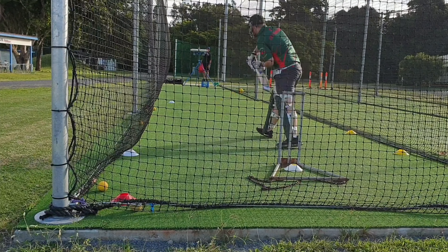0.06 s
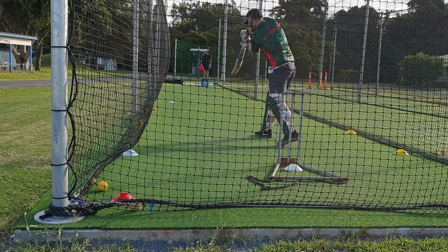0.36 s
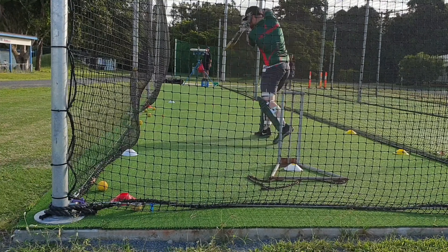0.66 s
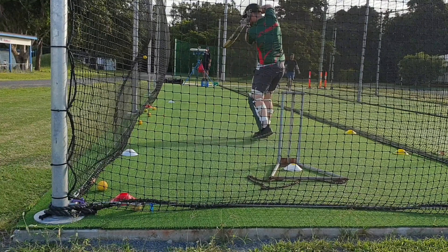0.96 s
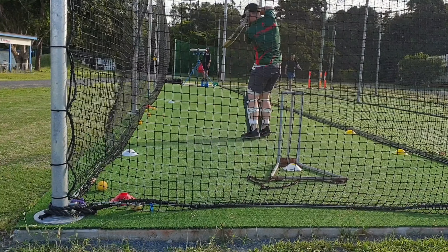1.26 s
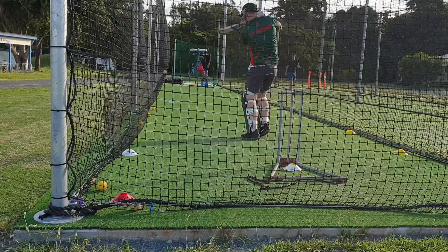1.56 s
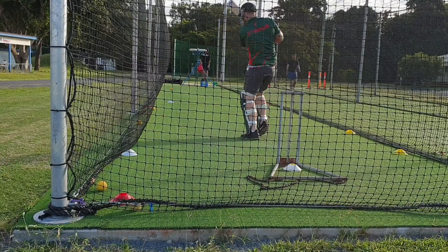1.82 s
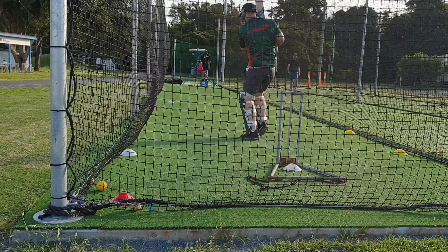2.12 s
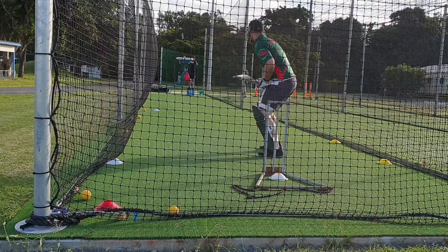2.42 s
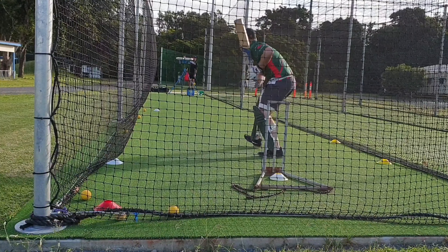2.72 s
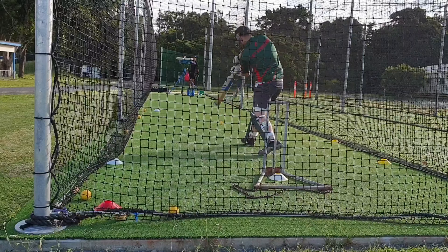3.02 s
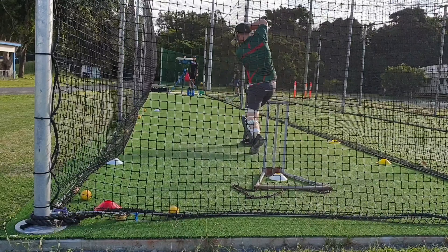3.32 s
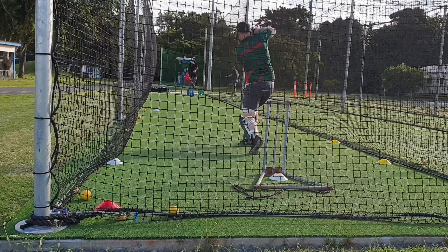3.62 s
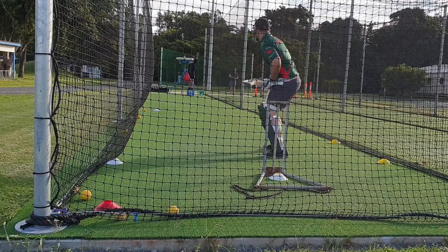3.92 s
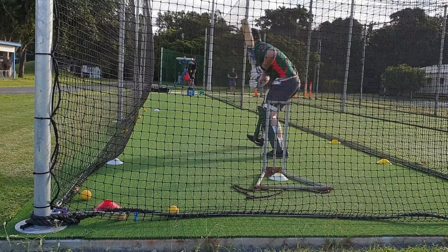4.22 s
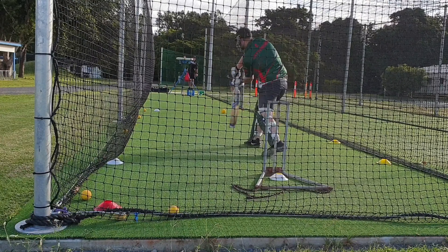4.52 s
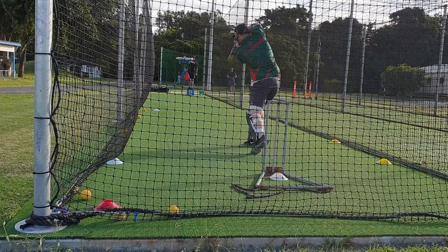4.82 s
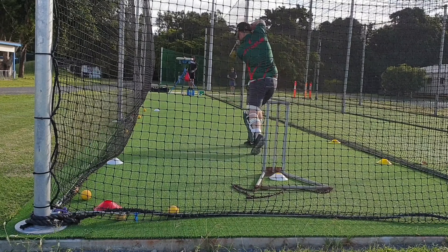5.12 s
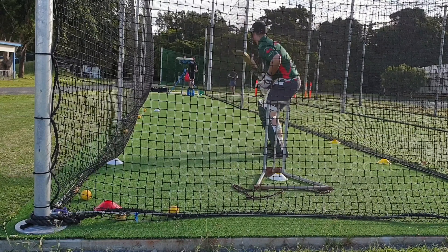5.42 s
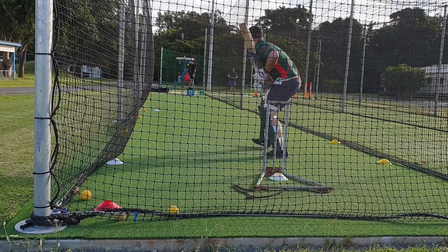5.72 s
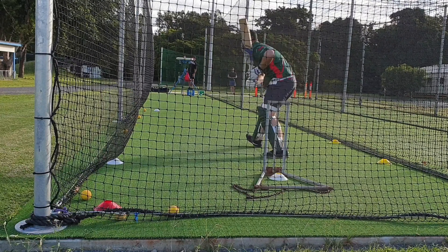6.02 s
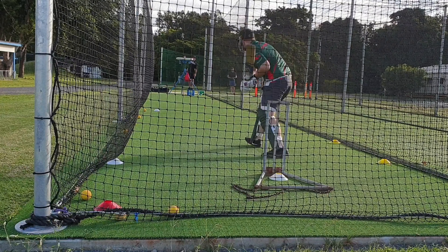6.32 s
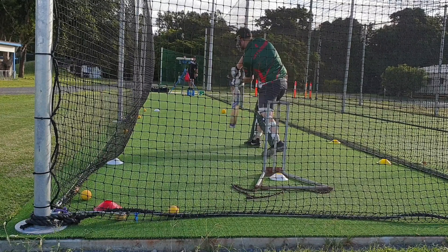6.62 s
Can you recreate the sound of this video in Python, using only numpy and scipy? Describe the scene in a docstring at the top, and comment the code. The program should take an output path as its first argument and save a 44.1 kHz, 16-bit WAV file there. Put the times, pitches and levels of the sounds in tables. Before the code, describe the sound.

In an outdoor practice net, a slowed, deep bat crack is followed by rattling netting and small knocks of the ball. Then, twice at normal speed, an air cannon thumps, the ball pats the mat and a bat cracks it sharply into the net. A last thump comes slowed and deeper. Wind rumbles on the microphone throughout, with faint high insects.

```python
"""Sharp bat cracks and hollow cannon thumps in an outdoor cricket net, over rumbling wind and insects.
An air cannon fires a ball with a hiss and a ring of its barrel; the ball whizzes in, pats the mat, cracks
off the willow bat and runs into the netting; fences and a line of trees answer. Of three shots the first
opens with the ball already in flight. The first and last are in slow motion, so they sound lower and
longer. Cue times are scene seconds; pitches and decays are given at natural speed."""
import sys
import numpy as np
from scipy import signal
from scipy.fft import rfft, irfft, next_fast_len
from scipy.io import wavfile
from scipy.ndimage import uniform_filter1d

SR = 44100
rng = np.random.default_rng(int(sys.argv[2]) if len(sys.argv) > 2 else 0)


def persist_wave(psi):
    """Save psi, clipped to +-1, as 16-bit WAV."""
    counts = np.round(np.clip(psi, -1, 1) * 32767).astype(np.int16)
    wavfile.write(sys.argv[1], SR, np.atleast_2d(counts).T)


N = 293706
T = np.arange(SR) / SR  # the first second of any sound
LEAD_S = .05
AGE = T[:SR // 2] - LEAD_S  # time from a blow, with room for what leads up to it

# dull body of the net's thud and the bat's swish: (frequency [Hz], level [dB])
THUD_EQ = [(60, -27), (200, 16), (450, 13), (750, 8), (1100, -6.5), (2000, -7), (8000, -40.5)]
# bright edge of rattling cords and the ball's scuff: (frequency [Hz], level [dB])
RATTLE_EQ = [(300, -36.5), (1400, -1), (2700, 10), (4000, 4.5), (7000, 4.5), (15000, -13)]


def undb(db):
    """Decibels to gain."""
    return 10 ** (np.asarray(db) / 20)


def fade(t, t60):
    """Falls 60 dB in t60 seconds; silent before t = 0."""
    return (t >= 0) * undb(-60 * np.abs(t) / t60)


def swell(t, rise, fall):
    """Peaks at t = 0, with a time constant on either side."""
    return np.exp(-np.abs(t) / np.where(t < 0, rise, fall))


def noise(size, side_db):
    """Stereo white noise; side_db sets its width."""
    mid, side = rng.standard_normal((2, size))
    width = undb(side_db)
    return np.array([mid + width * side, mid - width * side]) / np.hypot(1, width)


def colour(x, spectrum, size=4096):
    """Minimum-phase EQ through (frequency [Hz], level [dB]) points."""
    hz, db = np.transpose(spectrum)
    bin_hz = np.arange(size // 2 + 1) * SR / size
    gain = undb(np.interp(np.log(bin_hz + 1), np.log(hz), db))
    cepstrum = irfft(np.log(gain))[:size // 2]
    cepstrum[1:] *= 2
    response = irfft(np.exp(rfft(cepstrum, size)))
    return signal.oaconvolve(np.atleast_2d(x), response[None], axes=1)[:, :x.shape[-1]]


def click(db, spectrum):
    """One clean tick of the given colour."""
    return undb(db) * colour(signal.unit_impulse(len(AGE), int(LEAD_S * SR)), spectrum)


def band_limit(x, top_hz=15800):
    """A steep high cut."""
    return signal.sosfilt(signal.ellip(12, .1, 100, top_hz, fs=SR, output="sos"), x)


def add(out, sound, s):
    """Mix a sound in from s seconds on."""
    start = int(round(s * SR))
    part = np.atleast_2d(sound)[:, max(-start, 0):out.shape[1] - start]
    out[:, max(start, 0):max(start, 0) + part.shape[1]] += part


def cannon(thump_db, hiss_db, whizz_db):
    """Air spits past the ball, the barrel rings, the rest of the charge vents and the ball flies off."""
    # modes of the air in the barrel: (frequency [Hz], level [dB], t60 [s])
    modes = [(123.2, -35.5, 0.23), (148, -10.5, 0.16), (222, -15.5, 0.043), (292.7, -16, 0.03),
             (413, -30.5, 0.044), (596, -42, 0.12)]
    # leaking air, venting air and the ball's flight: (frequency [Hz], level [dB])
    leak_eq = [(300, 1.5), (900, 0), (1300, 9.5), (2700, -14.5), (3700, 4), (5000, -2.5), (7500, 3),
               (11000, -1), (15000, -6.5)]
    vent_eq = [(300, -2), (900, 2), (1500, 10.5), (2700, 2.5), (3800, 7.5), (5000, -1.5), (7500, -3.5),
               (11000, -7), (15000, -9.5)]
    whizz_eq = [(300, -16), (800, 4), (1500, -7.5), (2400, 2), (3400, 1.5), (4600, -2), (8000, -4.5),
                (15000, -12)]
    barrel = sum(undb(db) * np.cos(2 * np.pi * hz * AGE) * fade(np.maximum(AGE, 0), t60)
                 for hz, db, t60 in modes)
    thump = undb(thump_db) * barrel * np.exp(-(np.minimum(AGE, 0) / .0067) ** 2)
    # the boom comes back dull off a building
    delayed = np.interp(AGE - .152, AGE, thump, left=0)
    echo = colour(delayed, [(80, -26), (170, -17), (300, -23.5), (600, -42)])
    spits = (.99 * swell(AGE + .0058, .00043, .0013)
             + 1.8 * swell(AGE + .0023, .0011, .00081)
             + .3 * swell(AGE + .01, .003, .003))
    leak = colour(noise(len(AGE), side_db=-2) * spits, leak_eq)
    vent = colour(noise(len(AGE), side_db=-10.5) * undb(-12.5) * swell(AGE - .034, .027, .012), vent_eq)
    flight = swell(AGE - .31, .23, .54) * (AGE > 0)
    whizz = undb(whizz_db) * colour(noise(len(AGE), side_db=-1), whizz_eq) * flight
    return thump + echo + undb(hiss_db) * (leak + vent) + whizz + whistle()


def whistle(peak_db=-55.5, peak_hz=3496, peak_s=.285, glide_hz_per_s=9500):
    """The dimpled ball whistles as it flies nearer: a breathy band that swells, glides up and dies."""
    t = AGE - peak_s
    eddies = colour(noise(len(AGE), side_db=-4), [(200, .5), (350, -5), (700, -21.5), (2000, -59.5)])
    turns = np.cumsum(peak_hz + glide_hz_per_s * t) / SR
    return undb(peak_db) * eddies / eddies.std() * np.cos(2 * np.pi * turns) * swell(t, .06, .038)


def breeze(clock, buffet_db=3.5, buffets_per_s=9):
    """Wind level in dB: a slowly changing breeze, single gusts and random buffets."""
    # the underlying breeze: (time [s], level before trim [dB])
    levels = [(0.0, -42.5), (0.17, -47), (0.63, -62), (2.39, -55), (2.5, -51), (3.95, -59), (4.19, -42.5),
              (4.88, -45.5), (5.45, -48.5), (5.94, -39.5), (6.27, -51), (6.66, -42.5)]
    # gusts on top of it: (time [s], peak level [dB])
    peaks = [(.24, -45.5), (1.16, -41.5), (1.85, -46.5), (2.449, -44), (4.54, -37), (4.98, -40.5),
             (6.23, -37), (6.56, -32)]
    steady = undb(np.interp(clock, *np.transpose(levels)) + 2.5)
    gusts = sum(undb(db) * swell(clock - s, rise=.06, fall=.08) for s, db in peaks)
    buffets = np.interp(clock * buffets_per_s, np.arange(200), rng.standard_normal(200))
    return 20 * np.log10(np.hypot(steady, gusts)) + buffet_db * buffets


def veer(clock, from_db=-8, to_db=5, at_s=2.1, turn_s=.37):
    """Left and right gain as the wind veers from right to left; the windward side takes more."""
    turned = (1 + np.tanh((clock - at_s) / turn_s)) / 2
    lean_db = from_db + (to_db - from_db) * turned
    return undb(np.array([lean_db, -lean_db]) / 2)


def wind(clock):
    """Wind rumbles on the microphone; distant leaves stir a little more when it is up."""
    # the distant hush and the close rumble: (frequency [Hz], level [dB])
    hush_eq = [(100, -34), (450, -47.5), (750, -51), (1200, -55.5), (2000, -60), (4000, -59.5),
               (7000, -63.5), (11000, -72), (15000, -78.5)]
    rumble_eq = [(15, -9.5), (30, -6.5), (60, 6.5), (110, -4.5), (200, -11.5), (400, -32.5), (1000, -61),
                 (4000, -87)]
    breeze_db = breeze(clock)
    hush = colour(noise(len(clock), side_db=-1.5), hush_eq) * undb(.28 * (breeze_db + 48))
    rumble = colour(noise(len(clock), side_db=-3.5), rumble_eq)
    rumble *= veer(clock) * undb(breeze_db) / rumble.std()
    return hush + rumble


def bush_cricket(clock):
    """A high trill: each wing stroke slides down in pitch as it slows, and scrapes a little unevenly."""
    # course of the trill: (time [s], syllable rate [1/s], level [dB])
    trill = [(0, 124, -59.5), (.6, 130, -64), (.95, 120, -59.5), (1.171, 55, -60), (1.2, 120, -100)]
    s, rate, db = np.transpose(trill)
    syllable = np.cumsum(np.interp(clock, s, rate)) / SR % 1
    roughness = uniform_filter1d(rng.standard_normal(len(clock)), size=40)
    tooth_hz = 8000 * (1 - .07 * (syllable - .5) + .04 * roughness)
    envelope = undb(np.interp(clock, s, db)) * np.sin(np.pi * syllable) ** 2
    return envelope * np.sin(2 * np.pi * np.cumsum(tooth_hz) / SR)


def bat(contact_ms, knock_db, crack_db, ring_db, pitch, spread_db, swish_db):
    """A half-sine push radiates its slope as a knock; the faces crack together and the blade rings.
    Returns the direct sound and the sound sent in all other directions."""
    # modes of the willow blade: (frequency before the pitch factor [Hz], level [dB], t60 [s])
    modes = [(590, -2.5, .015), (1440, -11.5, 0.02), (1830, -11, .011), (2240, -12, 0.015), (3286, 2, 0.02),
             (3630, -9, 0.024), (3970, -3.5, 0.016), (5500, -16, 0.0054), (6050, -8, .009),
             (8340, -12, 0.013), (11500, -3.5, 0.01)]
    # the knock, the crack and the sound sent round the nets: (frequency [Hz], level [dB])
    knock_eq = [(40, -16.5), (150, 1), (300, -1.5), (620, -5.5), (1500, -3.5), (4000, -13), (16000, -11.5)]
    crack_eq = [(300, -19), (1100, -13), (2000, -2.5), (3500, -2), (7000, -3), (10000, -6.5), (14500, -11),
                (17000, -26.5)]
    spread_eq = [(60, -3), (200, 11.5), (650, 15.5), (1100, 0.5), (2000, -7), (3400, 1), (6000, -0.5),
                 (10000, -1), (15000, -13)]
    contact = AGE * 1000 / contact_ms  # 0 to 1 while the ball is on the bat
    knock = colour(np.cos(np.pi * contact) * ((contact >= 0) & (contact < 1)), knock_eq)
    burst = noise(len(AGE), side_db=-3.5) * swell(AGE - .0009, .00052, .0015) * (AGE > 0)
    crack = colour(burst, [(hz * pitch, db) for hz, db in crack_eq])
    t = AGE - np.array([[0], [1]]) / SR  # the ring reaches the right side a sample later
    ring = sum(undb(db) * np.cos(2 * np.pi * hz * pitch * t) * fade(t, t60) for hz, db, t60 in modes)
    ring *= np.clip(contact * 2, 0, 1)  # it builds up while the ball presses in
    swish = colour(noise(len(AGE), side_db=-17), THUD_EQ) * swell(AGE, .0096, .0055)
    direct = (undb(knock_db) * knock + undb(crack_db) * crack
              + undb(ring_db) * ring + undb(swish_db) * swish)
    # the blade beams each mode its own way, so all round it the spectrum is smooth
    return direct, click(spread_db, spread_eq)


def mesh_rustle(per_second=90, tap_db=-25, rattle_db=-24):
    """After a stroke the shaken mesh goes on tapping and ticking, ever more faintly."""
    def taps():
        """Sparse ticks of uneven size, scattered left and right."""
        return (rng.random(SR) < per_second / SR) * noise(SR, side_db=1) * swell(T - .08, .03, .24)
    cords = colour(taps(), [(100, -12.5), (400, 7), (750, 13.5), (1100, 4), (2000, -9.5), (8000, -29.5)])
    # each tick sets the neighbouring cords buzzing for a few milliseconds
    buzz = rng.standard_normal(SR) * fade(T, .015)
    ticks = signal.fftconvolve(taps(), buzz[None] / np.linalg.norm(buzz), axes=1)[:, :SR]
    return undb(tap_db) * cords + undb(rattle_db) * colour(ticks, RATTLE_EQ)


def net_snap(thud_db, rattle_db):
    """The mesh snaps taut with a thud and its cords rattle on the frame."""
    thud = colour(noise(len(AGE), side_db=-18.5) * swell(AGE - .001, .00031, .0096), THUD_EQ)
    rattle = colour(noise(len(AGE), side_db=1) * swell(AGE - .001, .0005, .0014), RATTLE_EQ)
    return undb(thud_db) * thud + undb(rattle_db) * rattle


def net_catch(swing_s, thud_db, rattle_db, thud_loss_db=3, rattle_loss_db=11):
    """The net takes the ball and snaps taut once a swing; the rattle dies sooner than the thud."""
    out = np.zeros((2, SR))
    for k in range(4):
        add(out, net_snap(thud_db - k * thud_loss_db, rattle_db - k * rattle_loss_db), k * swing_s)
    return out


def tock(db):
    """The loose ball knocks on something hard: a scuff and a hollow note that varies at each knock."""
    # modes of the ball: (frequency [Hz], level [dB], t60 [s])
    modes = [(1425, -2, 0.013), (2424, 2, 0.022), (2750, -1.5, 0.032), (3520, -3, 0.011),
             (5780, -5.5, 0.013)]
    ring = np.zeros(len(AGE))
    for hz, mode_db, t60 in modes:
        strength, detune = rng.standard_normal(2)
        tone = np.sin(2 * np.pi * hz * (1 + .055 * detune) * AGE)
        ring += undb(mode_db + 2 * strength) * tone * fade(AGE, t60)
    scuff = undb(-16) * colour(rng.standard_normal((2, len(AGE))) * fade(AGE, .042), RATTLE_EQ)
    return undb(db) * (ring * np.clip(AGE / .00091, 0, 1) + scuff)


def bounce(db):
    """The ball lands with a dead pat on the artificial turf."""
    # the mat's dull tone: (frequency [Hz], level [dB])
    mat_eq = [(40, -17), (150, -3), (380, 3), (700, -7), (1000, -5), (1600, -22.5), (3000, -16.5),
              (5000, -26.5), (15000, -39.5)]
    return click(db, mat_eq)


def scrape(db):
    """A short swish of cord over the ball, fluttering from knot to knot."""
    # cord friction: (frequency [Hz], level [dB])
    cord_eq = [(300, -7), (1500, -16), (2500, 4), (3500, 7), (4600, 1), (7000, 2.5), (15000, -10)]
    knots = undb(2.5 * np.repeat(rng.standard_normal(len(AGE) // 200 + 1), 200)[:len(AGE)])
    return undb(db) * colour(noise(len(AGE), side_db=0) * knots * swell(AGE, .0081, .022), cord_eq)


def insect_chorus(clock, from_s=2.31):
    """Many insects blend into one thin, high band of noise."""
    band_eq = [(7500, -100), (8900, -65.5), (9500, -55), (10100, -67.5), (11200, -100)]
    return colour(noise(len(clock), side_db=1.5), band_eq) * (clock >= from_s)


def surroundings(dry):
    """Poles and fences scatter the sound at once; the trees send back a late wash."""
    # tone of the near and far reflections: (frequency [Hz], level [dB])
    fence_eq = [(100, -25), (300, -14), (750, -14.5), (1500, -6), (3500, -6.5), (7000, -8), (14000, -8)]
    trees_eq = [(100, -16), (400, -31.5), (1000, -24.5), (1700, -14.5), (3500, -14), (7000, -19),
                (11000, -27.5), (15000, -23)]

    def scatter(envelope, patchy_db):
        """Echoes of uneven strength under an envelope, with unit energy per channel."""
        patches = np.repeat(rng.standard_normal(SR // 100 + 1), 100)[:SR]
        echoes = noise(SR, side_db=-1.5) * envelope * undb(patchy_db * patches)
        return echoes / np.sqrt(np.sum(echoes ** 2) / 2)
    near = scatter(fade(T - .004, .32), patchy_db=3)
    far = scatter(swell(T - .2, .055, .17), patchy_db=2.2)
    response = colour(near, fence_eq) + colour(far, trees_eq)
    return signal.fftconvolve(dry, response, axes=1)[:, :dry.shape[1]]


def microphone_ports(stereo):
    """Each of the two ports colours the direct sound in its own way."""
    # balance of the ports: (frequency [Hz], left minus right [dB])
    balance = [(100, 1.5), (1500, 2), (4000, -1.5), (8000, .5), (12000, 4)]
    return np.vstack([colour(channel, [(hz, side * db / 2) for hz, db in balance])
                      for channel, side in zip(stereo, (1, -1))])


def shot(start, end, speed):
    """Everything that happens in one shot, at natural speed, then stretched to its playback speed."""
    # the cannon fires: (time [s], thump [dB], hiss [dB], whizz [dB])
    firings = [(-.38, -10.5, -13, -51), (2.707, 0.5, -28.5, -50), (4.263, -0.5, -29, -50),
               (5.836, -.5, -30, -48.5)]
    # bat meets ball: (time [s], contact [ms], knock [dB], crack [dB], ring [dB], pitch [factor],
    # send round the nets [dB], swish [dB])
    strokes = [(.3182, 0.81, -5.5, -5, -9, .78, 6.5, -45),
               (3.1542, 1.4, -1.5, -1.5, -9.5, 1.0, 11.5, -58.5),
               (4.7045, 1.47, -1, -6, -15, 1.08, 11.5, -46.5)]
    # the net takes the ball: (time [s], swing period [s], thud [dB], rattle [dB])
    catches = [(.352, .0425, -33, -23.5), (3.1705, .037, -30.5, -21), (4.7205, .0415, -29.5, -23)]
    # the ball knocks on something hard, lands on the mat, drags along the net: (time [s], level [dB])
    tocks = [(.377, -37), (.420, -33.5), (.514, -41.5), (.556, -42.5), (.776, -44.5), (.966, -41),
             (1.130, -38.5), (1.345, -53), (3.558, -47.5), (5.028, -49)]
    bounces = [(.482, 1), (.753, -7), (3.040, 6), (4.6037, 7), (4.846, -7)]
    scrapes = [(.70, -59), (.78, -57), (3.475, -54), (5.02, -55), (5.095, -47), (5.215, -56)]

    def during(cues):
        """The cues in this shot, as (natural time since its start [s], controls)."""
        return [((s - start) * speed, controls) for s, *controls in cues if start <= max(s, 0) < end]
    size = int((end - start) * speed * SR)
    clock = np.linspace(start, end, size)
    effects, cracks, spread = np.zeros((3, 2, size))
    tracks = (firings, cannon), (bounces, bounce), (catches, net_catch), (tocks, tock), (scrapes, scrape)
    for cues, source in tracks:
        for s, controls in during(cues):
            add(effects, source(*controls), s - LEAD_S)
    for s, controls in during(strokes):
        direct, all_round = bat(*controls)
        add(cracks, direct, s - LEAD_S)
        add(spread, all_round, s - LEAD_S)
        add(effects, mesh_rustle(), s)
    action = microphone_ports(effects + cracks) + surroundings(effects + spread)
    ambience = wind(clock) + bush_cricket(clock) + insect_chorus(clock)
    sound = band_limit(action + ambience) * signal.windows.tukey(size, 200 / size)  # click-free edges
    padded = next_fast_len(size + 100)
    return signal.resample(np.pad(sound, ((0, 0), (0, padded - size))), round(padded / speed), axis=1)


def scene():
    """The three shots, one after another."""
    # slow, natural, slower still: (start [s], end [s], playback speed [factor])
    shots = [(0, 2.31, .64), (2.31, 5.26, 1), (5.26, 6.67, .4)]
    out = np.zeros((2, N))
    for start, end, speed in shots:
        add(out, shot(start, end, speed), start)
    return out


def record(dry):
    """Any peak past full scale is clipped, then the top is cut."""
    return band_limit(np.clip(dry, -1, 1))


dry = scene()
out = record(dry)
persist_wave(out)
```